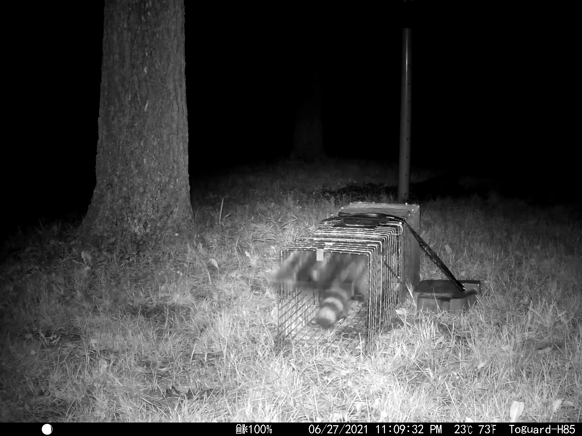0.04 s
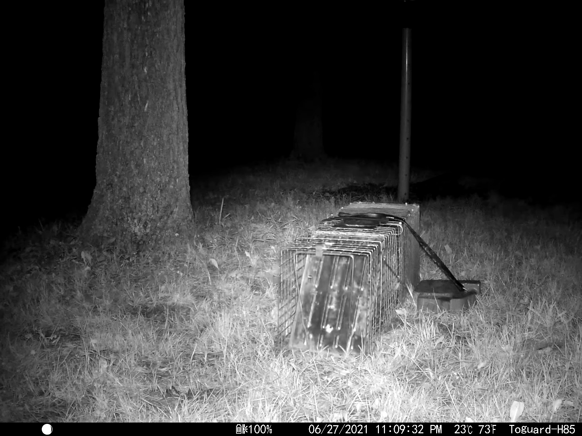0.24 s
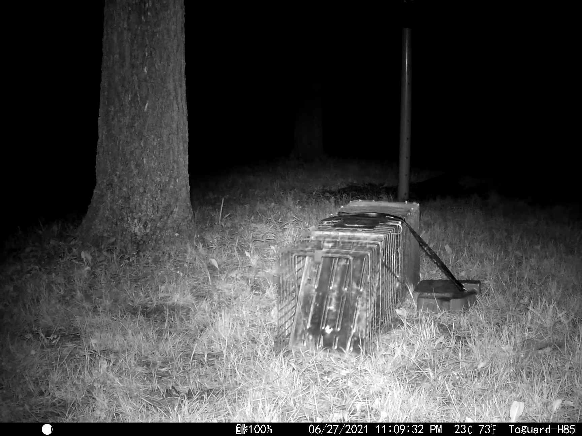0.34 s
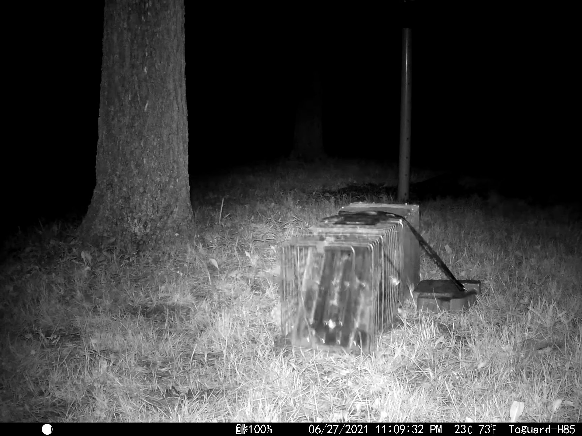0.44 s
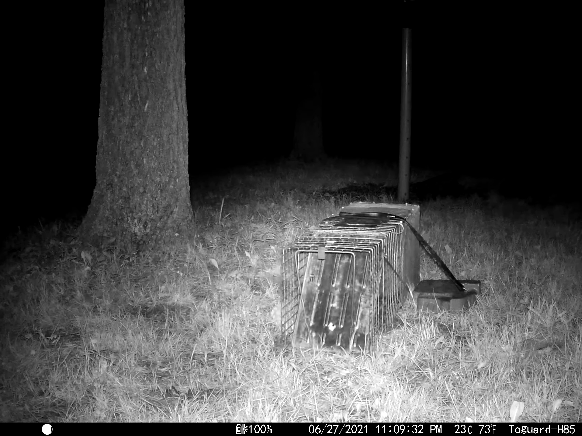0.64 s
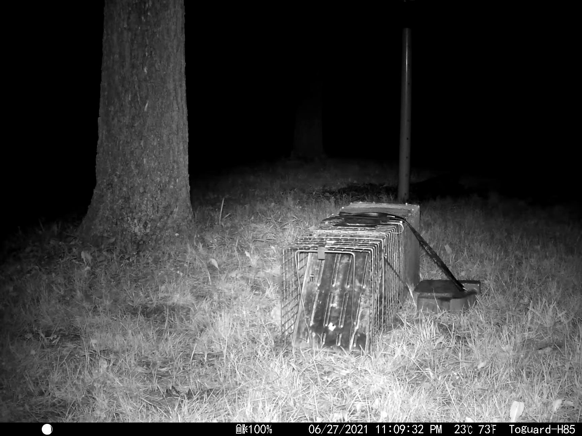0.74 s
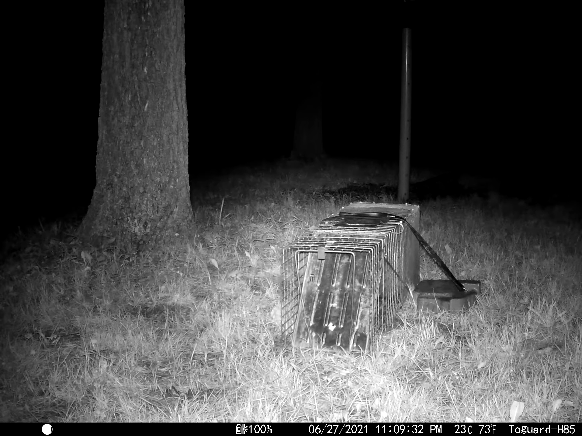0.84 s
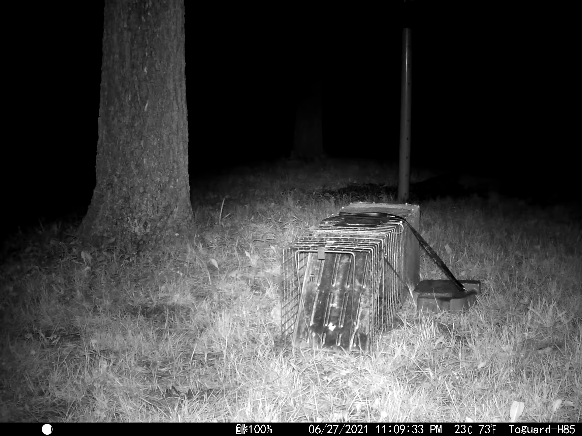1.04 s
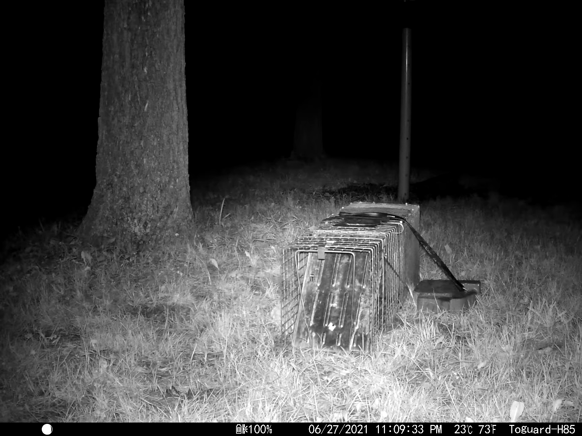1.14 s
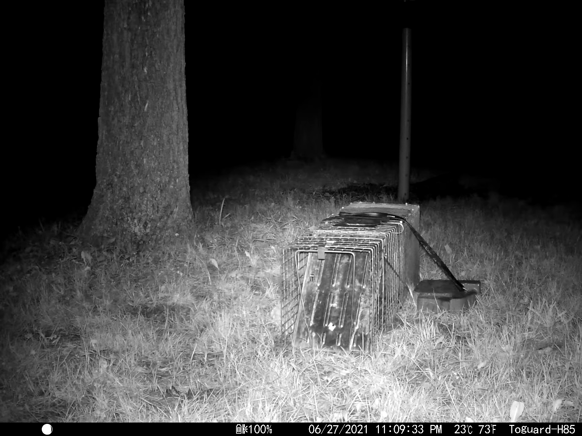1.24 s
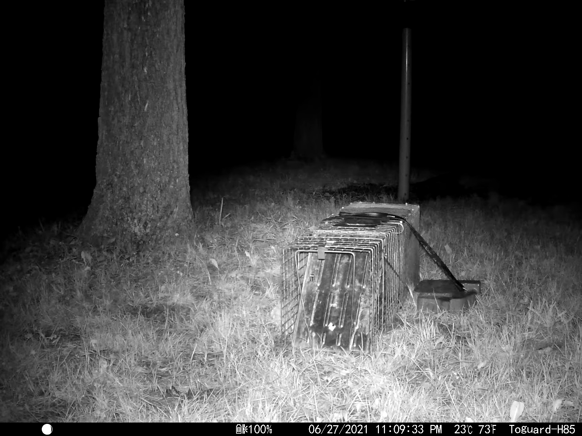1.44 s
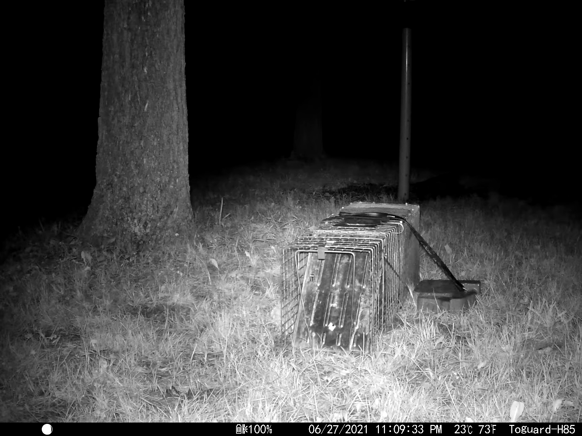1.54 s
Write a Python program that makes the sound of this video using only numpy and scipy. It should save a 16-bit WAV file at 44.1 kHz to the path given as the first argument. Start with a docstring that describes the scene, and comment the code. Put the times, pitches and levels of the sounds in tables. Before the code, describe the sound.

A metal cage trap door trips with light ticks, then slams in a loud, bright, rattling clang that quickly settles; faint crickets trill behind it on quiet night grass, heard close, in mono.

```python
"""On grass at night, the wire door of a cage trap trips, slams and rattles to rest.
Each blow is a chatter of contacts that excites the mesh, with decaying modes of wires and frame.
One cricket trills throughout as a train of gliding tones; a second chirps in pairs later on.
Behind them, shaped noise gives still air, a far insect chorus and a faint low rumble that comes and goes."""
import sys
import numpy as np
from scipy import signal
from scipy.fft import rfft, irfft
from scipy.io import wavfile
from scipy.ndimage import uniform_filter1d

SR = 44100
rng = np.random.default_rng(int(sys.argv[2]) if len(sys.argv) > 2 else 0)


def wav_out(sig):
    """Save sig, one row per channel (or a flat mono array), as 16-bit PCM at SR to the path in sys.argv[1]."""
    wavfile.write(sys.argv[1], SR, np.round(np.clip(np.atleast_2d(sig).T, -1, 1) * 32767).astype(np.int16))


N = 70560

# Blows of the door. Each row: start in seconds, relative level in dB, clank (below about 3 kHz) in dB,
# frame share in dB, treble (above about 9 kHz) in dB, chatter swell in seconds,
# chatter decay constant in seconds, brightest pitch in Hz.
DOOR_BLOWS = [(0.069, -26, 6, -19, -22, 0.0045, 0.031, 4820),
              (.1062, -16.5, -1, -11, -2.5, .0004, 0.016, 6800),
              (.164, -19, 8, -11.5, 4, 0.0013, 0.019, 5460), (.181, -20.5, 1, -11.5, 1, 0.0088, .01, 5700),
              (0.224, -27.5, -4, -9, 0.5, 0.0045, 0.0073, 5600),
              (0.2439, 0, -2.5, -13, -18.5, .0005, 0.0097, 7150),
              (0.2534, 1.5, -2, -5, -9.5, .001, 0.018, 5870), (0.2614, 1, 6, 0, -8.5, 0.0024, 0.0041, 4838),
              (0.2771, 2.5, -9, 5.5, 2.5, 0.00043, 0.024, 5870),
              (0.2885, 0.5, -5.5, 1, 6, 0.0024, 0.0092, 6300),
              (0.2966, -7, 10, -2.5, 3.5, 0.00017, 0.006, 7300),
              (.319, -2, -11.5, -7.5, -4.5, 0.0014, 0.025, 5910),
              (.345, -2, -1, -52, 4.5, 0.00094, 0.017, 5660),
              (0.373, -15.5, 8.5, 5, 5, 0.00077, 0.013, 5880), (.387, -5.5, 4, -9, 2.5, .002, 0.075, 7400),
              (.438, -5, -0.5, -5, 0, 0.009, 0.0085, 5740),
              (0.4629, -1.5, -7.5, -4.5, 0, 0.00068, 0.0068, 7180),
              (.478, -7, 4, -3.5, 12, 0.0022, 0.014, 5790),
              (0.5004, -7.5, 2.5, -10, 3.5, .001, 0.0073, 7300),
              (0.515, -2.5, -10, -9.5, -3, 0.00073, 0.0053, 7170),
              (.524, -9, 7, -39, 7, 0.00083, 0.019, 6700), (.548, -15.5, 3, 9, 3, 0.00042, 0.0062, 2770),
              (.5535, -2.5, -1.5, -5.5, -5, .001, 0.0086, 6220),
              (.588, -14.5, 5, -50, -1, 0.000847, 0.006, 5900),
              (.633, -21, 2.5, -15, -8, 0.0011, 0.003, 3760), (0.639, -18, -3, 1.5, 2, 0.0014, 0.004, 6200),
              (0.681, -38.5, -4.5, -8, 0, 0.0023, 0.012, 6200),
              (.724, -28.5, -12, 8.5, -3, 0.0019, 0.0093, 6620),
              (.801, -32, -1.5, -3, -3, 0.0024, 0.011, 6500),
              (.835, -42.5, 33, -3, -0.5, .012, 0.032, 6000)]
MESH_DB, FRAME_DB = 14, -37


def door():
    """Superposition: each blow sums mesh, frame, wires and clink in its own proportions."""
    out = np.zeros(N)
    mesh = even(rfft(mesh_ring()))
    frame = frame_ring()
    for start, db, clank_db, frame_db, treble_db, swell, decay, bright_hz in DOOR_BLOWS:
        colour = blow_colour(clank_db, frame_db, treble_db, bright_hz)
        # multiplying spectra convolves the contacts with the mesh's ring
        clash = unit(irfft(mesh * rfft(chatter(swell, decay)) * undb(colour), N))
        wires = wire_ring(bright_hz)
        bright_clink = clink(bright_hz)
        add(out, undb(db) * (undb(MESH_DB) * clash + undb(FRAME_DB + frame_db) * frame), start)
        add(out, undb(db) * (wires + bright_clink), start + swell)
    return out


CONTACTS_PER_S, MAIN_CONTACT = 700, 1.72  # mean rate; amplitude of the contact at the swell time


def chatter(swell, decay):
    """Random impulse train: small contacts of either sign build up and die away."""
    t = clock() + 1 / SR
    happens = rng.random(N) < CONTACTS_PER_S / SR
    sign = rng.choice([-1, 1], N)
    contacts = happens * sign * undb(rng.uniform(-4.8, 4, N))
    contacts[int(swell * SR)] = MAIN_CONTACT
    return unit(contacts * (1 - np.exp(-t / swell)) * np.exp(-t / decay))


# Ring time of the mesh. Each row: frequency in Hz, time to fall 60 dB in seconds.
MESH_RING_TIMES = [(200, 0.24), (1300, 0.37), (3500, 0.29), (6500, 0.22), (13000, 0.081)]
CRACK_DB, CRACK_S = 8, .006  # added early crack, decay constant


def mesh_ring():
    """Dense modal decay: countless close resonances of the welded mesh after a short crack."""
    t, hz = clock(), np.fft.rfftfreq(N, 1 / SR)
    dense = rfft(rng.standard_normal(N))
    out = 0
    for f, t60 in MESH_RING_TIMES:
        # overlapping bands, each fading into its neighbours
        share = along(hz, [(g, float(g == f)) for g, _ in MESH_RING_TIMES])
        out = out + irfft(dense * share, N) * np.exp(-np.log(1000) * t / t60)
    return unit(out * (1 + undb(CRACK_DB) * np.exp(-t / CRACK_S)))


# Colour of the mesh before each blow tilts it. Each row: frequency in Hz, relative level in dB.
MESH_COLOUR = [(100, -26.5), (200, -7.5), (450, -8), (650, -20), (810, -14), (930, -17.5), (1250, -10),
               (1700, -12.5), (1950, -17.5), (2400, -11.5), (2900, -14), (3500, -6.5), (4300, -10.5),
               (4900, -4), (5450, -7), (5800, 0), (6170, -1), (6400, -6), (7200, -2), (7750, -10.5),
               (8450, -6.5), (9800, -18.5), (12000, -23.5), (15500, -39.5)]
BRIGHT_DB, CLANK_HZ, FRAME_EDGE_HZ, TREBLE_HZ = 4.5, 3000, 430, 9000


def blow_colour(clank_db, frame_db, treble_db, bright_hz):
    """Spectral shaping: three shelves, a bright peak and the struck spot tint the mesh, in dB."""
    hz = np.fft.rfftfreq(N, 1 / SR)
    colour = along(hz, MESH_COLOUR) + BRIGHT_DB * nearness(hz, bright_hz) + spot(hz)
    colour = colour + treble_db / (1 + (TREBLE_HZ / (hz + 1)) ** 10)
    colour = colour + clank_db / (1 + (hz / CLANK_HZ) ** 4)
    return colour + frame_db / (1 + (hz / FRAME_EDGE_HZ) ** 4)


def spot(hz):
    """Position-dependent response: each spot on the mesh favours some pitches over others, in dB."""
    knots = np.arange(0, SR / 2, 130)  # Hz
    response = np.interp(hz, knots, rng.uniform(-6.6, 6, len(knots)))
    return np.minimum(hz / CLANK_HZ, 1) * response


def nearness(hz, centre):
    """Resonance curve: 1 at the centre pitch, a Gaussian fall in octaves away from it."""
    return np.exp(-.5 * (np.log2((hz + 1) / centre) / 0.052) ** 2)


def even(spectrum):
    """Spectral whitening: remove the broad colour over 250 Hz and keep the fine resonances."""
    return spectrum / np.sqrt(uniform_filter1d(abs(spectrum) ** 2, int(250 * N / SR)))


# Modes of the wires. Each row: frequency in Hz, relative level in dB, time to fall 60 dB in seconds.
WIRE_MODES = [(3472, -12, .28), (4690, -15, .24), (4933, -9, .25), (5233, -8, .25), (5752, 1, .26),
              (5820, -3, .26), (5925, -1, .26), (6127, -1, .29), (6666, -3, .26), (6820, -6, .24),
              (7160, -4, .23), (7290, -6, .24), (7420, -7, .24), (8473, -6, .24), (8995, -9, .26)]
WIRES_DB, WIRE_FOCUS_DB = -30, 1.5


def wire_ring(bright_hz):
    """Modal synthesis: the wires ring at random phases, stronger near the brightest pitch."""
    struck = [(f, db + WIRE_FOCUS_DB * nearness(f, bright_hz), t60) for f, db, t60 in WIRE_MODES]
    return undb(WIRES_DB) * ring(struck, rng.uniform(0, 2 * np.pi, len(WIRE_MODES)))


CLINK_DB, CLINK_T60_S, CLINK_DETUNE = -23, 0.2, 0.022  # detune as a fraction of the pitch


def clink(bright_hz):
    """Beating: the struck wire sounds three neighbouring tones, the outer two 5 dB weaker."""
    modes = [(bright_hz * (1 + k * CLINK_DETUNE), CLINK_DB - 5 * abs(k), CLINK_T60_S)
             for k in (-1, 0, 1)]
    return ring(modes, rng.uniform(0, 2 * np.pi, size=3))


# Modes of the frame and door panel. Each row: frequency in Hz, relative level in dB,
# time to fall 60 dB in seconds.
FRAME_MODES = [(63.8, -17, .12), (185.6, -5.5, 0.52), (198.8, -1, .17), (258, -3.5, 0.29),
               (306.7, 1.5, 0.68), (327.9, -2, 0.19), (384, -4.5, 1), (495, -8, 0.23), (557, -9.5, 0.36),
               (777, -9, .35), (845, -13.5, 0.54)]


def frame_ring():
    """Modal synthesis: the frame and door panel ring with every mode starting from zero phase."""
    return ring(FRAME_MODES, np.zeros(len(FRAME_MODES)))


def ring(modes, phases):
    """Free vibration: a sum of exponentially decaying sines."""
    out = np.zeros(N)
    for (hz, db, t60), phase in zip(modes, phases):
        t = np.arange(min(N, int(t60 * SR))) / SR
        decay = np.exp(-np.log(1000) * t / t60)
        out[:len(t)] += undb(db) * decay * np.sin(2 * np.pi * hz * t + phase)
    return out


def crickets():
    """Diffuse scattering: trees answer both crickets with a decaying noise tail."""
    direct = echoed(trill()) + chirps()
    trees = unit(rng.standard_normal(N) * np.exp(-np.log(1000) * clock() / 0.41))  # t60 0.41 s
    return direct + undb(-13) * signal.fftconvolve(direct, trees)[:N]


# Trilling cricket over time. Each row: time in seconds, level in dB.
TRILL_LEVEL = [(0, -57.5), (.9, -51.5), (1.1, -58), (1.28, -54), (1.46, -52.5), (1.6, -53)]
TRILL_START_S, TRILL_PERIOD_S, TRILL_PULSE_S = -.004, .02559, 0.019
TRILL_HZ, TRILL_FALL_HZ = 5382, 382


def trill():
    """Periodic stridulation: similar wing strokes, slightly varied in pitch, repeat at a steady rate."""
    out = np.zeros(N)
    for start in np.arange(TRILL_START_S, N / SR, TRILL_PERIOD_S):
        stroke = wing_stroke(TRILL_HZ, TRILL_FALL_HZ, TRILL_PULSE_S)
        add(out, undb(np.interp(start, *np.array(TRILL_LEVEL).T)) * stroke, start)
    return out


# Echoes of the trill from ground and trunk. Each row: delay in seconds, relative level in dB.
TRILL_ECHOES = [(.0045, -26.5), (0.0105, -26.5)]


def echoed(x):
    """Discrete reflection: weak delayed copies join the direct sound."""
    return x + sum(undb(db) * np.interp(clock() - lag, clock(), x) for lag, db in TRILL_ECHOES)


# Double chirps of the second cricket. Each row: start in seconds, level of the first pulse in dB.
CHIRP_PAIRS = [(0.886, -59.5), (1.116, -63.5), (1.326, -60), (1.535, -59.5)]
CHIRP_HZ, CHIRP_FALL_HZ, SECOND_RISE_HZ = 4330, 295, 94.2
CHIRP_PULSE_S, CHIRP_GAP_S, SECOND_DB = 0.015, .023, 2.5  # gap from onset to onset


def chirps():
    """Paired stridulation: the second stroke of each pair is higher and louder."""
    out = np.zeros(N)
    for start, db in CHIRP_PAIRS:
        for k in range(2):
            stroke = wing_stroke(CHIRP_HZ + k * SECOND_RISE_HZ, CHIRP_FALL_HZ, CHIRP_PULSE_S)
            add(out, undb(db + k * SECOND_DB) * stroke, start + k * CHIRP_GAP_S)
    return out


def wing_stroke(hz, fall_hz, length):
    """Frequency glide: a swelling and fading tone sags as the cricket's wing slows."""
    u = np.linspace(0, 1, int(length * SR))
    pitch = hz * (1 + .004 * rng.standard_normal()) - fall_hz * u ** 2.7
    return np.sin(np.pi * u) * np.sin(2 * np.pi * np.cumsum(pitch) / SR)


def night():
    """Incoherent background: independent noises of rumble, air and far insects add up."""
    low = rumble()
    return air() + far_insects() + low


# Low rumble over time. Each row: time in seconds, level in dB.
RUMBLE_LEVEL = [(0, -101), (.11, -78), (0.148, -49), (.2, -59.5), (.48, -64.5), (.7, -67), (1.259, -73),
                (1.284, -48.5), (1.342, -56), (1.39, -53), (1.5, -51), (1.54, -70), (1.6, -65)]
# Colour of the rumble. Each row: frequency in Hz, relative level in dB.
RUMBLE_SPECTRUM = [(15, -0.5), (32, -1), (70, -1), (130, -15.5), (400, -41), (1500, -76)]


def rumble():
    """Amplitude modulation: low-frequency noise comes and goes."""
    return noise(RUMBLE_SPECTRUM) * undb(np.interp(clock(), *np.array(RUMBLE_LEVEL).T))


# Colour of the night air. Each row: frequency in Hz, relative level in dB.
AIR_SPECTRUM = [(25, -5.5), (100, 0.5), (200, -3.5), (500, -13.5), (1000, -18), (2500, -21.5), (6000, -20),
                (14000, -23)]


def air():
    """Stationary noise: still air with most of its density in the bass."""
    return undb(-62) * noise(AIR_SPECTRUM)


# Colour of the far insect chorus. Each row: frequency in Hz, relative level in dB.
CHORUS_SPECTRUM = [(3600, -39), (4350, -10.5), (4800, -16.5), (5300, 3), (5650, -1), (6000, -22.5),
                   (7000, -44.5)]


def far_insects():
    """Narrow-band noise: the voices of a far chorus merge into steady bands."""
    return undb(-65.5) * noise(CHORUS_SPECTRUM)


def noise(points):
    """Spectral filtering: white noise takes the given colour, at rms 1."""
    spectrum = rfft(rng.standard_normal(N))
    x = irfft(spectrum * undb(along(np.fft.rfftfreq(N, 1 / SR), points)), N)
    return x / x.std()


def along(hz, points):
    """Logarithmic pitch axis: interpolate a table over log frequency."""
    f, v = np.array(points).T
    return np.interp(np.log(hz + 1), np.log(f), v)


def undb(db):
    """Logarithmic level: decibels to amplitude gain."""
    return 10 ** (np.asarray(db) / 20)


def clock():
    """Uniform sampling: the time of each sample in seconds."""
    return np.arange(N) / SR


def unit(x):
    """Energy normalization: scale to a sum of squares of 1."""
    return x / np.sqrt(np.sum(x ** 2))


def add(out, x, start):
    """Linear superposition: mix x in from a start time, trimmed to the scene."""
    i = int(start * SR)
    x, i = x[max(-i, 0):], max(i, 0)
    out[i:i + len(x)] += x[:max(N - i, 0)]


def scene():
    """Superposition: the trap among the night sounds, in one channel."""
    return (door() + crickets() + night())[None]


def record(dry):
    """Soft saturation and low-pass filtering: loud peaks are rounded, the top treble is cut."""
    rounded = dry / (1 + (dry / .85) ** 4) ** .25  # output approaches a ceiling of 0.85
    treble_cut = signal.ellip(10, .2, 80, 15600, fs=SR, output="sos")  # edge at 15.6 kHz
    return signal.sosfilt(treble_cut, rounded)


dry = scene()
out = record(dry)
wav_out(out)
```